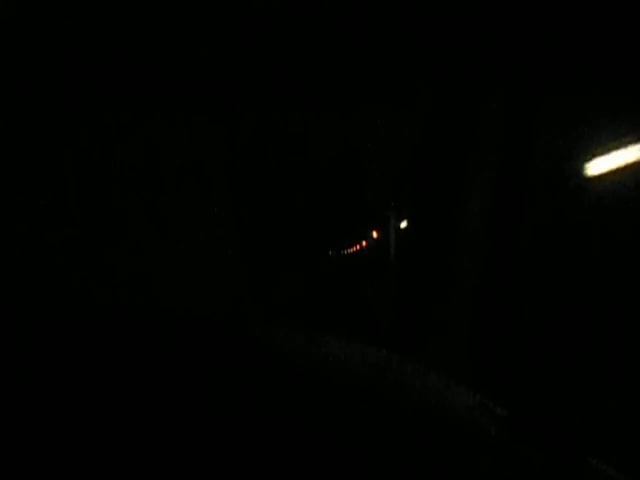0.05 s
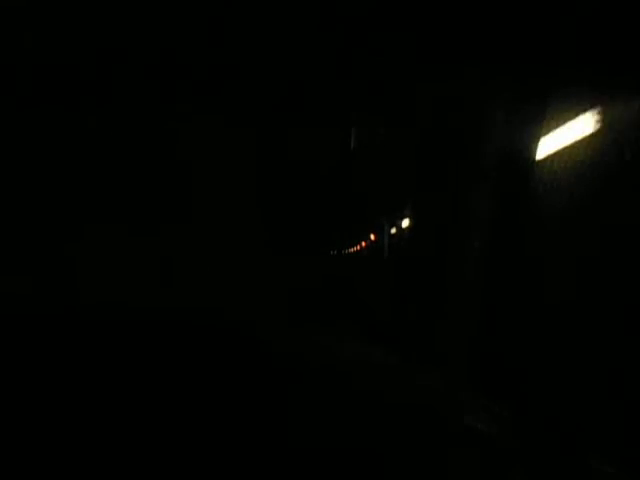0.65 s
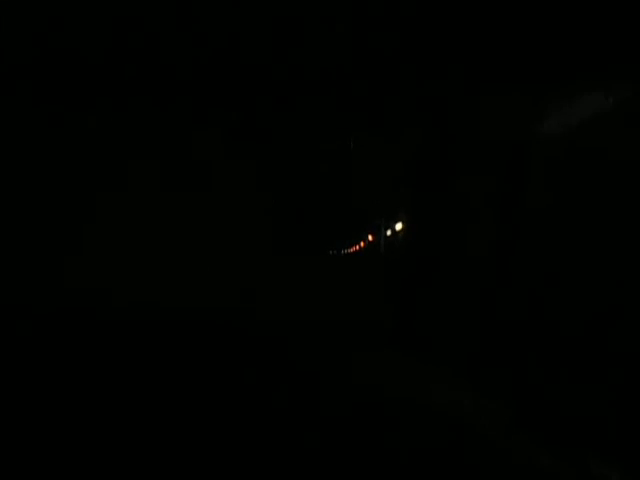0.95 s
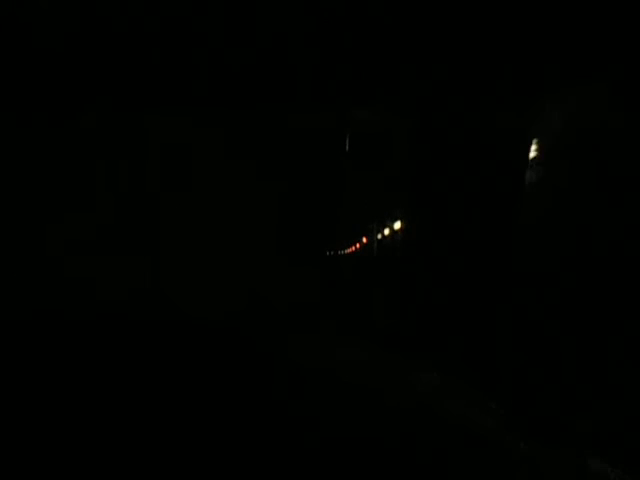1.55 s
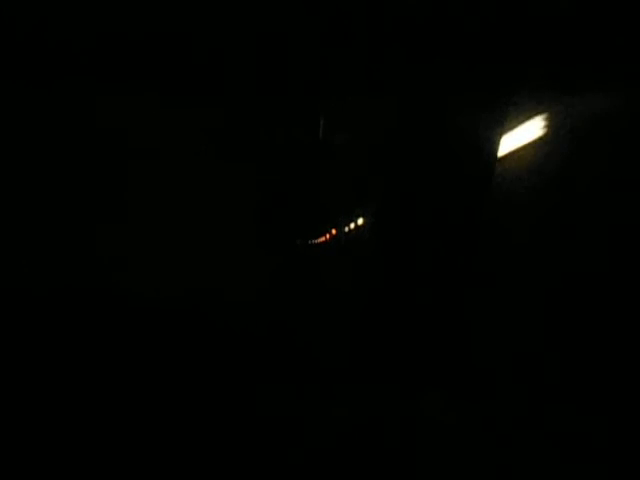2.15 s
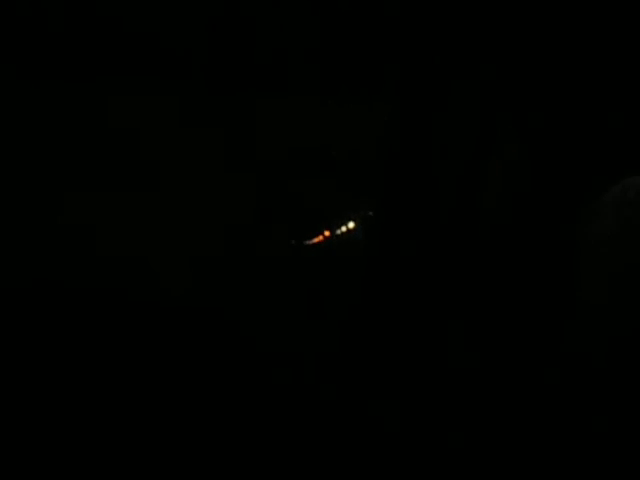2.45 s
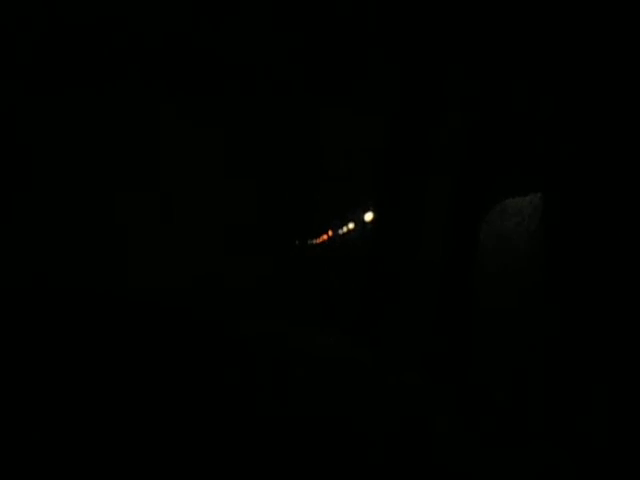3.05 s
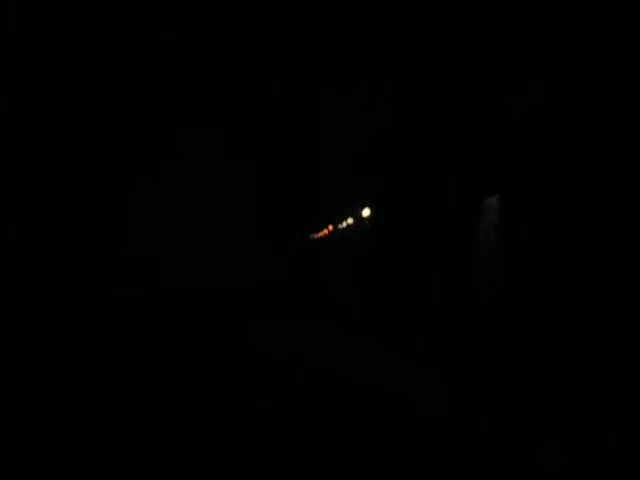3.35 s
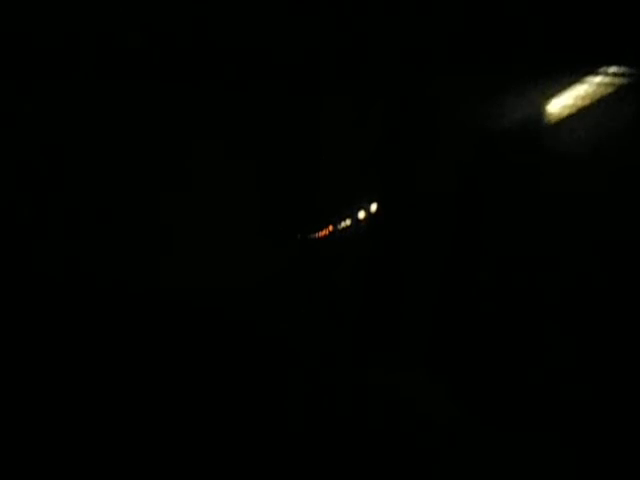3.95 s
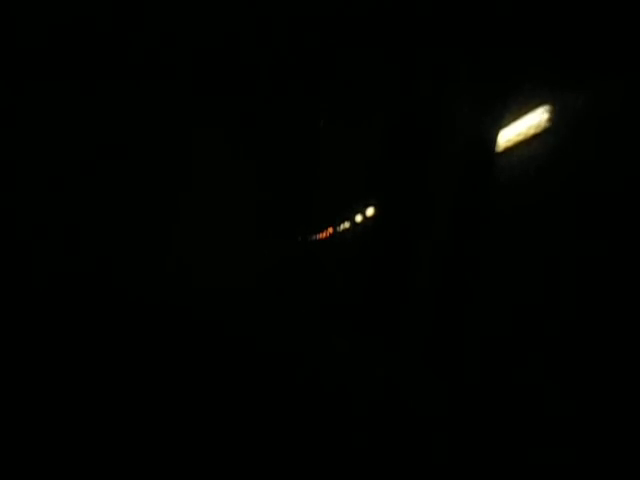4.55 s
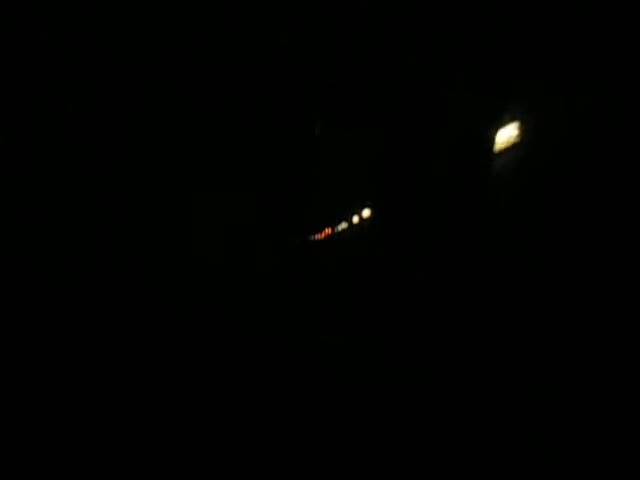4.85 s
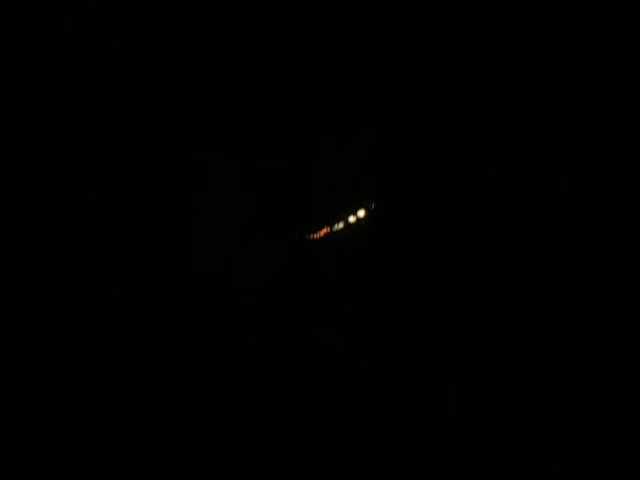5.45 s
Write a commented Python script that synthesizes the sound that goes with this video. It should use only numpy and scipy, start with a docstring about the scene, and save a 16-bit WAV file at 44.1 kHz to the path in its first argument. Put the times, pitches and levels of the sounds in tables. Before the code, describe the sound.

Inside a slowing train's cab, wheels rumble on tunnel rails under a falling motor whine, a steady fan hum and scattered sharp clicks.

```python
"""Wheels roar on the rails as a light rail car slows in a tunnel, heard from inside the cab.
Rough track sways the body. Gear tones fall with speed and swell at the body's resonances;
the inverter's whine falls too. A loose cab fitting clicks sharply over the steady-pitched hum
of a fan and other auxiliaries. A narrow-band input overloads on the peaks."""
import sys
import numpy as np
from scipy import signal
from scipy.fft import rfft, irfft
from scipy.io import wavfile

SR = 44100
rng = np.random.default_rng(int(sys.argv[2]) if len(sys.argv) > 2 else 0)


def wrap_up_sound(samples):
    """Save the sound to the file named by the first command line argument, as 16-bit audio."""
    columns = np.atleast_2d(samples).T
    # keep every value between -1 and 1, then stretch to whole-number steps
    tamed = np.clip(columns, -1, 1)
    steps = np.round(tamed * 32767).astype(np.int16)
    wavfile.write(sys.argv[1], SR, steps)


N = 246959
TIME = np.arange(N) / SR


def rolling(gear_hz):
    """Rough rails sway the body; the wheels rumble, roar and hiss in the tunnel."""
    # wheel-on-rail loudness: t/s, level/dB
    loudness = [(0.1, -33.5), (0.9, -34), (1.5, -34), (2.4, -37), (4.91, -37.5), (5.5, -37)]
    # uneven track spots: t/s, extra sway/dB
    jolts = [(.11, 10), (.43, 6), (1.19, 4.5), (1.43, 6.5), (1.68, 5), (2.06, 6.5)]
    # noise spectra: f/Hz, relative density/dB
    sway_spectrum = [(12, -13.5), (20, -3), (27, 3), (38, -6), (50, -11.5), (60, 1.5), (75, -11.5),
                     (110, -28)]
    rumble_spectrum = [(50, -13), (80, 4), (100, -0.5), (140, -3), (180, -1), (215, -5), (265, -2),
                       (295, -9.5), (345, -5), (410, -16), (460, -7.5), (540, -20.5), (750, -17.5)]
    roar_spectrum = [(250, -8), (450, 2.5), (650, -3.5), (800, -1), (1050, 0), (1300, -4.5), (1600, -9),
                     (1950, -14), (2600, -25)]
    hiss_spectrum = [(1400, -16), (2000, 5.5), (2350, 5.5), (2600, 1), (3000, 0.5), (3400, -2.5),
                     (3700, -6), (4150, -4.5), (4600, -10.5), (5200, -15), (5500, -28.5), (5900, -35)]
    jolt_half_s = 0.099
    rolling_db = in_time(loudness)
    swing_db = rolling_db - rolling_db.mean()
    jolt_db = sum(db * np.exp(-((TIME - at_s) / jolt_half_s) ** 2) for at_s, db in jolts)
    sway = from_db(-19.5 + 1.5 * swing_db + jolt_db) * noise(sway_spectrum)
    rumble = from_db(-17.5) * (gear_hz / gear_hz.mean()) ** 0.18 * noise(rumble_spectrum)
    roar = from_db(-22 + 1.27 * swing_db + 0.5 * drift(rate_hz=18)) * noise(roar_spectrum)
    hiss = from_db(-32.5 + 0.77 * swing_db + 0.31 * drift(rate_hz=18)) * noise(hiss_spectrum)
    return sway + rumble + roar + hiss


def gears(gear_hz):
    """Gear tones fall with speed; they weaken when the motors stop braking and unload the gears."""
    # gear tones: multiple of main tone, level/dB re body response
    orders = [(1, -1), (2.06, -15), (2.3, -7), (3.0, -13.5)]
    brake_off_s, fade_s, unloaded_db = 3.96, 0.05, -12.5
    load_db = unloaded_db * np.clip((TIME - brake_off_s) / fade_s, 0, 1)
    out = 0
    for multiple, db in orders:
        hz = multiple * gear_hz
        out += from_db(db + load_db) * body_gain(hz) * tone(hz, unsteady=0.2, rate_hz=6)
    return out


def body_gain(hz):
    """The car body's resonances lift each tone that glides through them."""
    # body resonances: f/Hz, width/Hz, peak level/dB
    modes = [(92.6, 9, -11), (106.5, 4.4, -19.5), (120, 8.8, -23), (136.1, 12, -11.5), (149.8, 7.3, -14.5),
             (177.7, 16, -18.5), (185.7, 4.9, -17.5), (222.8, 12, -15.5), (268, 24, -12.5),
             (344, 11, -17.5), (382, 21, -16), (425.8, 10, -18.5), (449, 15, -16), (490, 20, -21.5)]
    return sum(from_db(db) / (1 + (2 * (hz - mode_hz) / width_hz) ** 2)
               for mode_hz, width_hz, db in modes)


def inverter(gear_hz):
    """Whine at the switching rate plus a share of motor speed, with a faint octave."""
    # whine loudness: t/s, level/dB
    loudness = [(0, -24), (.17, -33), (.27, -39.5), (.95, -36.5), (1.2, -38.5), (2.1, -41), (2.5, -36),
                (3.1, -35), (4.1, -36.5), (5.6, -38)]
    switching_hz = 2010
    whine_hz = switching_hz + 0.69 * gear_hz
    whine = from_db(in_time(loudness)) * tone(whine_hz, unsteady=0.58, rate_hz=18)
    octave_gain = from_db(-51) * (gear_hz / gear_hz.mean()) ** 0.5
    return whine + octave_gain * tone(2 * whine_hz, unsteady=0.7, rate_hz=42)


def fitting_clicks(focus_octaves=0.68, scatter_db=3.2, tail_db=-27, tail_t60_s=0.02):
    """Each snap briefly rings the loose fitting's modes; the cab adds a faint tail."""
    # snaps: t/s, level of first 2 ms/dB, spectral centre/Hz, t60/s
    snaps = [(1.2577, -10.5, 3100, 0.02), (1.5099, -16.5, 2800, 0.011), (1.5523, -8, 4630, 0.0097),
             (1.561, -10, 3000, 0.019), (1.6012, -17.5, 3750.0, 0.011), (1.6926, -7, 2730, 0.0087),
             (1.7437, -11, 3050, 0.012), (1.7605, -14.5, 2950.0, 0.016), (1.885, -21, 3240.0, 0.012),
             (1.944, -22, 3930.0, 0.011), (1.9596, -6, 2270, 0.024), (2.0639, -18, 2930, 0.017),
             (2.1399, -17, 2630.0, 0.0087), (2.223, -21.5, 2330, 0.013), (2.742, -11, 2800, 0.0095),
             (2.842, -25, 4400, 0.0067), (3.001, -14, 3470, 0.018), (3.1713, -12, 3280, 0.014),
             (3.7672, -23, 3320.0, 0.016), (3.8869, -11, 2700, 0.015), (4.1966, -9, 2620, 0.005),
             (4.2809, -29.5, 5660, 0.0096), (4.9039, -10.5, 3300, 0.016), (4.9997, -18, 2320, 0.012),
             (5.2326, -12.0, 2400, 0.014)]
    # fitting modes: f/Hz, relative level/dB
    modes = [(1500, 4.5), (2080, 2.5), (2330, 0.5), (2700, -1), (3100, -2), (3550, -2.5), (3850, -1),
             (4400, -6.5), (4950, -2), (5350, -16)]
    out, t = np.zeros(N), TIME[:SR // 10]
    mode_hz, mode_db = np.transpose(modes)
    signs = (-1) ** np.arange(len(modes))   # neighbouring modes in antiphase
    cab_band = signal.butter(2, [1800, 5000], "band", fs=SR, output="sos")
    for at_s, snap_db, centre_hz, t60_s in snaps:
        strength = signs * from_db(mode_db + scatter_db * rng.standard_normal(len(modes)))
        strength *= np.exp(-0.5 * (np.log2(mode_hz / centre_hz) / focus_octaves) ** 2)
        ring_hz = mode_hz * (1 + 0.02 * rng.standard_normal(len(modes)))   # contact point shifts modes
        ring = strength @ np.sin(2 * np.pi * ring_hz[:, None] * t) * from_db(-60 * t / t60_s)
        ring /= np.sqrt(np.mean(ring[:SR // 500] ** 2))
        tail = rms_one(signal.sosfilt(cab_band, rng.standard_normal(len(t))))
        tail *= from_db(tail_db - 60 * t / tail_t60_s)
        start = int(at_s * SR)
        out[start:start + len(t)] += (from_db(snap_db) * (ring + tail))[:N - start]
    return out


def auxiliary_hum(shaft_hz=29.615, blades=23, swell_db_per_s=0.61):
    """The ventilation fan and other auxiliaries hold their pitch at any car speed."""
    # fan hum: multiple of shaft rate, level/dB
    fan_orders = [(2, -22), (4, -25.5), (8, -26), (12, -38.5), (19, -30.5), (24, -31), (25, -34),
                  (30, -40.5)]
    # other auxiliaries: f/Hz, start level/dB, end level/dB, unsteadiness/0-1
    auxiliaries = [(170.9, -20.5, -25.5, 0.85), (542, -45, -32, .4), (620.3, -41.5, -28.5, .45),
                   (633, -39.5, -32.5, 0.8), (812.4, -36.5, -34.5, 0.2), (998, -39.5, -37.5, 0.5),
                   (1101, -39.5, -39, 0.1)]
    blade = from_db(-25.5 + swell_db_per_s * TIME) * tone(blades * shaft_hz, unsteady=0.098, rate_hz=5.4)
    fan = sum(from_db(db) * tone(multiple * shaft_hz, unsteady=0.39, rate_hz=4.2)
              for multiple, db in fan_orders)
    others = sum(from_db(np.linspace(start_db, end_db, N)) * tone(hz, unsteady, rate_hz=4.9)
                 for hz, start_db, end_db, unsteady in auxiliaries)
    return blade + fan + others


def tone(hz, unsteady, rate_hz):
    """Sine of rms 1; a share arrives by changing paths, so it fades and wanders."""
    wander = (drift(rate_hz) + 1j * drift(rate_hz)) / np.sqrt(2)
    paths = np.sqrt(1 - unsteady ** 2) + unsteady * wander
    turns = np.cumsum(hz * np.ones(N)) / SR + rng.random()
    return np.sqrt(2) * np.real(paths * np.exp(2j * np.pi * turns))


def noise(spectrum):
    """Noise of rms 1 with the given spectrum, falling steeply beyond its ends."""
    hz = np.maximum(np.arange(N // 2 + 1) * SR / N, 1)
    point_hz, point_db = np.transpose(spectrum)
    gain = from_db(np.interp(np.log(hz), np.log(point_hz), point_db))
    skirts = np.minimum(1, np.minimum(hz / point_hz[0], point_hz[-1] / hz)) ** 4
    return rms_one(irfft(rfft(rng.standard_normal(N)) * gain * skirts, N))


def drift(rate_hz):
    """Random wander of rms 1, low-passed at rate_hz."""
    hz = np.arange(N // 2 + 1) * SR / N
    return rms_one(irfft(rfft(rng.standard_normal(N)) / (1 + (hz / rate_hz) ** 2), N))


def in_time(curve):
    """A (t/s, value) curve at every sample."""
    return np.interp(TIME, *np.transpose(curve))


def from_db(db):
    """Decibels to gain."""
    return 10 ** (np.asarray(db) / 20)


def rms_one(x):
    """Scale to unit power."""
    return x / np.sqrt(np.mean(np.abs(x) ** 2) + 1e-20)


def scene():
    """All sources in the cab, mono."""
    # near-even slowing: t/s, main gear tone/Hz
    slowing = [(0, 233.2), (1.5, 184), (2.4, 151.5), (3.2, 120.3), (3.6, 107), (3.95, 93), (5.6, 52)]
    gear_hz = in_time(slowing)
    return (rolling(gear_hz) + gears(gear_hz) + inverter(gear_hz)
            + auxiliary_hum() + fitting_clicks())[None]


def record(dry, mic_edge_hz=5900, overload=0.74, cutoff_hz=16000):
    """Narrow-band input; its flattened peaks spit a little treble."""
    narrow = signal.sosfilt(signal.cheby1(14, 0.3, mic_edge_hz, fs=SR, output="sos"), dry)
    clipped = narrow / (1 + np.abs(narrow / overload) ** 20) ** (1 / 20)
    return signal.sosfilt(signal.ellip(8, 0.3, 70, cutoff_hz, fs=SR, output="sos"), clipped)


dry = scene()
out = record(dry)
wrap_up_sound(out)
```